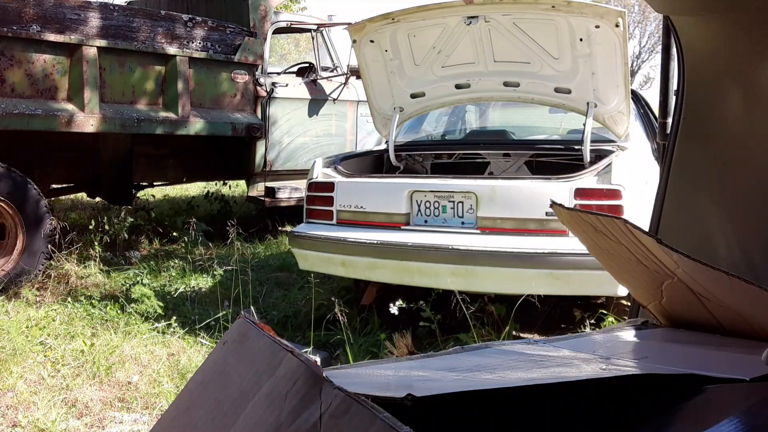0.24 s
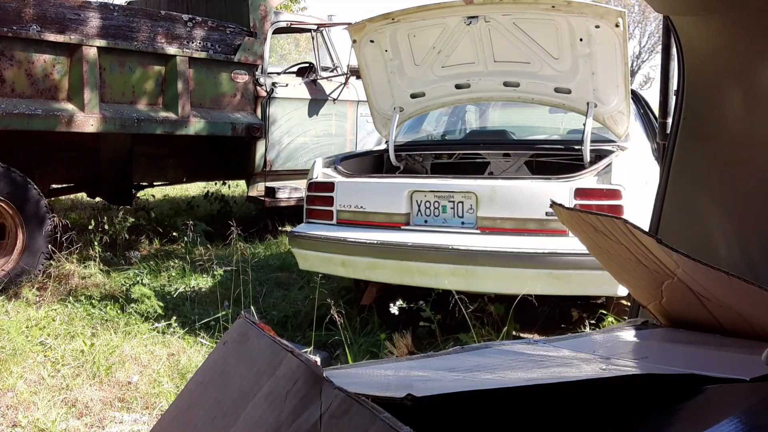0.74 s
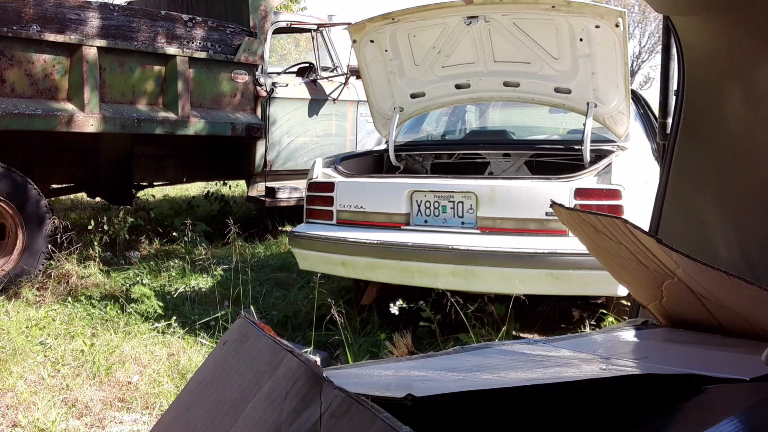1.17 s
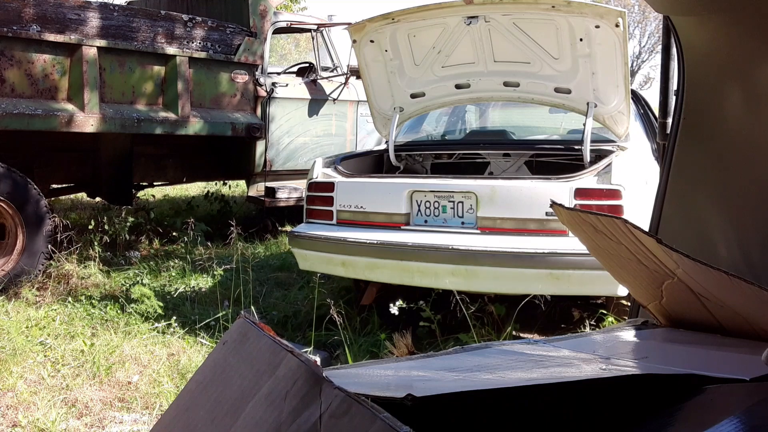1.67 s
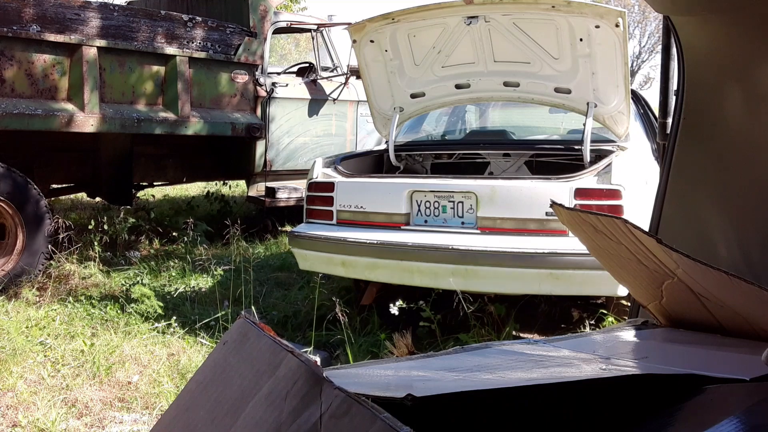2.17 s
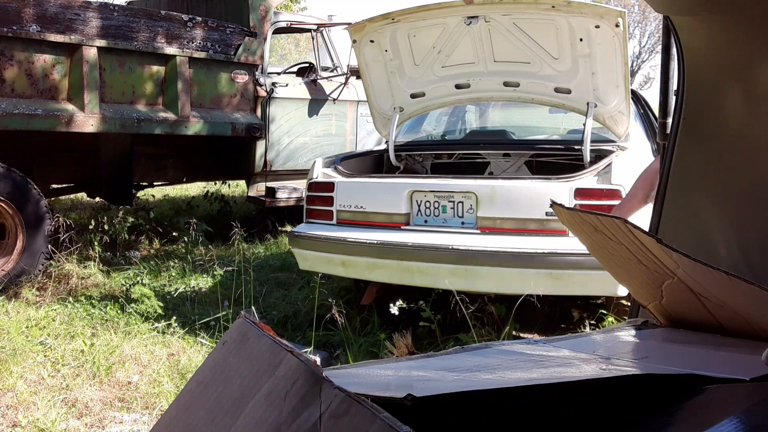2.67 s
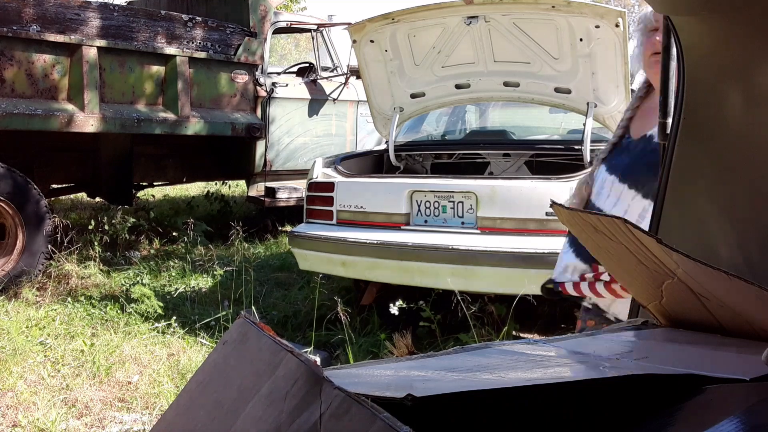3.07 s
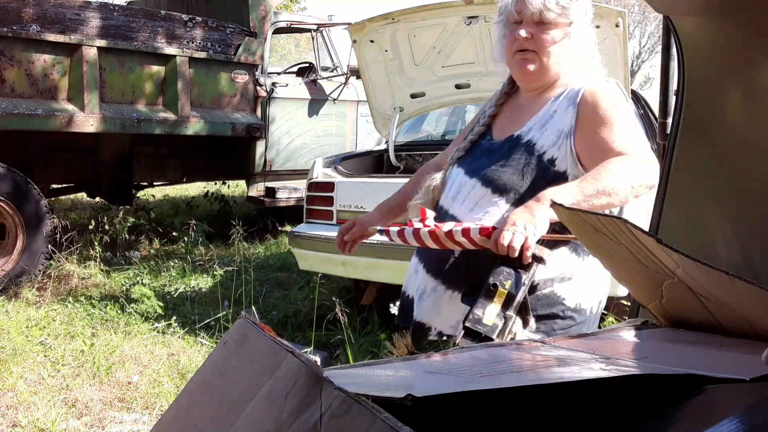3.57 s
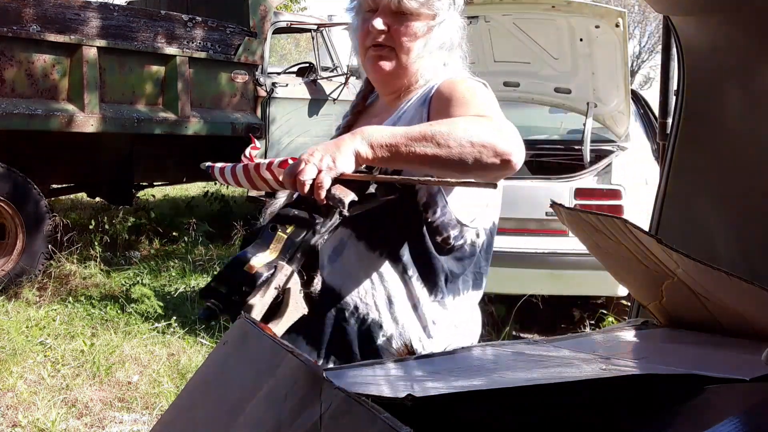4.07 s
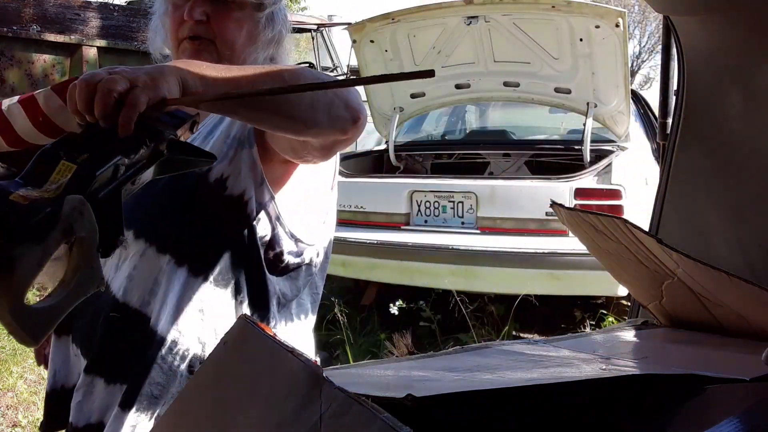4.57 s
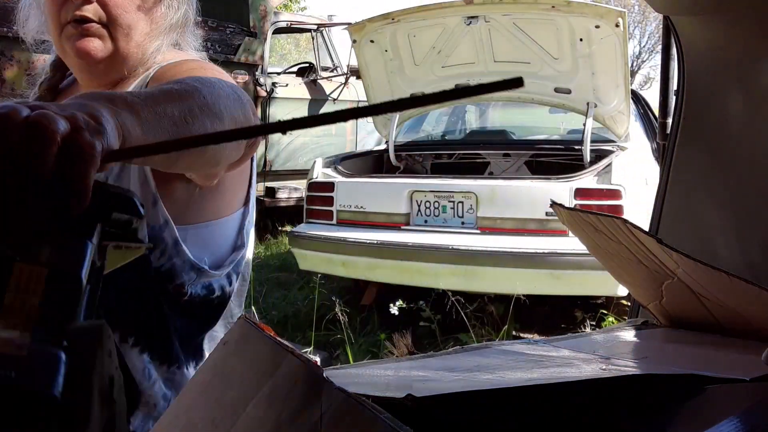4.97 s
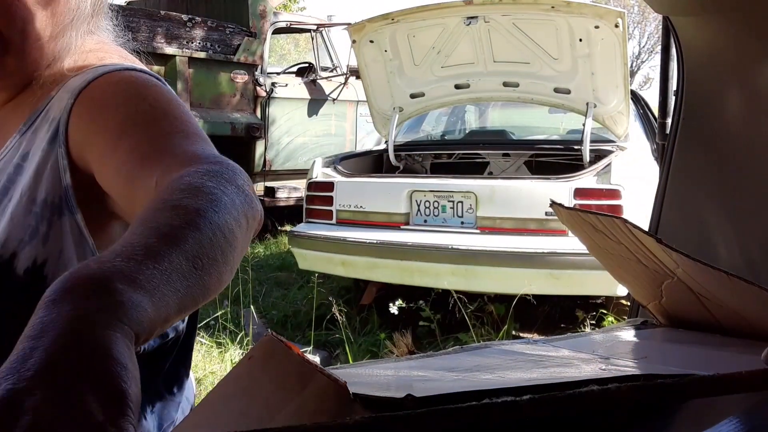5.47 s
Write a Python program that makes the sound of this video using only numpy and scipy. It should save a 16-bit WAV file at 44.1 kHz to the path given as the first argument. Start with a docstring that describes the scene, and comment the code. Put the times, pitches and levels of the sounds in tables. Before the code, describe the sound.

Heard from an open car boot, outdoor insects sing: evenly pulsing cricket chirps and a thin, throbbing rasp that grows and then stops suddenly. After a faint metal clink, someone walks closer over grass, twigs cracking and cloth rustling. Finally a tool is shoved onto a cardboard box close to the microphone, making a short, loud cluster of hollow knocks and scrapes.

```python
"""A sunny yard heard from inside an open car boot. From the start a cricket chirps in threes and a katydid
rasps, both by stridulation, over a hiss of distant insects; something clinks on metal further off.
From 1.3 s footsteps come closer through the grass while the katydid swells, to break off at 4 s.
At 5 s the walker leans a power tool on a cardboard box by the microphone and shoves it across:
friction scrapes and flexes the panels, and impacts ring their damped modes."""
import sys
import numpy as np
from scipy import signal
from scipy.fft import rfft, irfft
from scipy.io import wavfile
from scipy.ndimage import uniform_filter1d

SR = 44100
rng = np.random.default_rng(int(sys.argv[2]) if len(sys.argv) > 2 else 0)


def inscribe(sig):
    """Save sig as 16-bit PCM at rate SR to the path in sys.argv[1].

    A 1-D sig is mono; a 2-D sig holds one channel per row.
    Samples are clipped to [-1, 1] before scaling.
    """
    pcm = np.round(np.clip(np.atleast_2d(sig).T, -1, 1) * 32767)
    wavfile.write(sys.argv[1], SR, pcm.astype(np.int16))


N = 252246
TIME = np.arange(N) / SR
HZ = np.fft.rfftfreq(N, 1 / SR)

# Levels in the tables are relative; a source may add a gain of its own.
# panel modes of the box: pitch_hz, level_db, t60_s
PANEL_MODES = [(192, -11.5, 0.19), (337, -6.5, 0.03), (644, -2, 0.034), (853, 0.5, 0.046),
               (1020, -18, 0.033), (1905, -6, 0.032), (2595, -8, 0.032)]
# shoves of the tool: peak_s, scrape_db, flex_db, rise_s
SHOVES = [(5.238, -34.5, -26.5, .017), (5.264, -26, -28, .016), (5.291, -17, -22, .013),
          (5.314, -16.5, -26, .011), (5.336, -21, -30, .019), (5.374, -28, -27.5, .014),
          (5.445, -38.5, -41, .034), (5.566, -50, -52.5, 0.073)]
# spectra of sliding grit and of bending cardboard: frequency_hz, level_db
SCRAPE_SPECTRUM = [(200, -30), (380, -8), (500, -13), (630, -5.5), (900, -4), (1200, -6), (1900, -7.5),
                   (2650, -6), (3700, -10.5), (5500, -12), (8500, -15), (15800, -16.5)]
FLEX_SPECTRUM = [(25, -31), (55, -10), (110, 2), (180, 2.5), (320, -2), (420, -5.5), (800, -12),
                 (2000, -46)]
# low modes shaken by every shove: pitch_hz, width_hz, level_db
LOW_MODES = [(84, 14, -11.5), (180, 50.3, -8.5), (290, 81.6, -7.5)]
def cardboard(scrape_db=-2, flex_db=-1.5, fall_ratio=1.14):
    """Sliding friction is a broadband force: it scrapes grit, bends the box and drives its resonances."""
    sliding = swells([(s, db, rise) for s, db, _, rise in SHOVES], fall_ratio)
    bending = swells([(s, db, rise) for s, _, db, rise in SHOVES], fall_ratio)
    resonances = 1 + sum(band(hz, 0.85 / t60) for hz, _, t60 in PANEL_MODES)
    scrape = noise(amp(spectrum(SCRAPE_SPECTRUM)) * resonances, grain_db=1) * amp(scrape_db)
    flex = noise(amp(spectrum(FLEX_SPECTRUM)), grain_db=2) * amp(flex_db)
    flex += sum(amp(db) * rubbed_mode(hz, width) for hz, width, db in LOW_MODES)
    return sliding * scrape + bending * flex


# impacts on the box: start_s, level_db, decay_ratio, pitch_ratio
BLOWS = [(5.2285, -15, 0.62, 1.19), (5.268, -9.5, 0.52, 0.34), (5.279, -5, 0.81, 1),
         (5.3095, -5, 0.41, 0.86), (5.321, -13.5, 0.68, 0.64), (5.368, -11, 0.85, 0.326)]
def blows(gain_db=-7, crack_db=-6, crack_t60_s=0.033, attack_s=0.00038):
    """Impulse excitation: the tool's edges strike with a crack and the panel modes decay freely."""
    out = np.zeros((2, N))
    t = np.arange(SR // 4) / SR
    onset = 1 - np.exp(-t / attack_s)
    for s, db, decay_ratio, pitch_ratio in BLOWS:
        skews = rng.standard_normal((len(PANEL_MODES), 2, 1))  # high modes reach the sides out of phase
        modes = 0
        for (hz, mode_db, t60), skew in zip(PANEL_MODES, skews):
            phase = 2 * np.pi * hz * pitch_ratio * t + skew * hz / 1000
            modes += amp(mode_db - 60 * t / (t60 * decay_ratio)) * np.sin(phase)
        crack = rng.standard_normal((2, len(t))) * amp(crack_db - 60 * t / crack_t60_s) * pitch_ratio
        add(out, s, amp(db + gain_db) * (modes + crack) * onset)
    return echoes(out, t60_s=0.083, wet_db=-10)


def flap(level_db=-46):
    """Forced vibration: a flap drones while the tool's weight is on it."""
    load = gate(5.03, 5.53, attack_s=0.0068, release_s=.03)
    return amp(level_db) * rubbed_mode(hz=63, width_hz=18.3) * load


# squeaks and hollow rubs: peak_s, level_db, rise_s, pitch_hz
RUBS = [(2.662, -58, 0.057, 598), (2.758, -54, 0.014, 2530), (3.49, -59, .17, 600), (5.048, -46, .018, 325),
        (5.109, -49, 0.029, 310), (5.18, -47, 0.015, 980), (5.45, -50, 0.018, 2670)]
def rubs(width_ratio=.27):
    """Friction between loose parts excites one rough pitch at each contact."""
    return sum(swell(s, db, rise, rise) * rubbed_mode(hz, width_ratio * hz) for s, db, rise, hz in RUBS)


# footfalls: peak_s, tread_db, blades_db, rise_s
STEPS = [(1.275, -56, -64, 0.062), (2.152, -56, -60, 0.084), (2.743, -52.5, -52, 0.066),
         (3.269, -46.5, -52.5, 0.056), (3.83, -46, -53, 0.059), (4.38, -58, -51.5, 0.047)]
# the approaching walker's steady rustle: time_s, level_db
RUSTLE_LEVEL = [(1.45, -73), (1.65, -66.5), (2.0, -68), (2.42, -75), (3.07, -74.5), (3.15, -56.5),
                (3.95, -55.5), (4.13, -64), (4.3, -56.5), (4.55, -58), (4.95, -65)]
# cloth brushing past: peak_s, level_db, rise_s
CLOTH_SWISHES = [(2.61, -56, 0.05), (3.145, -47, 0.025), (3.68, -50, .05), (4.24, -46, 0.035),
                 (4.56, -59, 0.044), (4.81, -55, .05), (5.025, -51, 0.015), (5.165, -47.5, 0.068),
                 (5.451, -39.5, 0.017), (5.59, -53.5, 0.066)]
# spectra of crushed grass and of brushed blades or cloth: frequency_hz, level_db
TREAD_SPECTRUM = [(35, -10), (60, 0), (100, -7), (170, 2.5), (300, -1.5), (480, -2), (620, 0), (800, -9),
                  (1150, -16), (1400, -7.5), (2000, -38), (3800, -20), (6000, -25)]
SWISH_SPECTRUM = [(300, -9), (700, 3), (1500, -2), (3000, -3.5), (5500, -3), (8000, 1), (12000, 3),
                  (16000, -1)]
def footsteps(lumps_db=2, blades_lead_s=0.0047, thin_below_hz=323):
    """Many tiny contacts sum to noise: soles crush grass, stems crackle, blades and cloth swish."""
    soles = swells([(s, db, rise) for s, db, _, rise in STEPS]) * amp(lumps_db * drift(32))
    blades = swells([(s - blades_lead_s, db, rise) for s, _, db, rise in STEPS])
    brushing = np.hypot(blades, swells(CLOTH_SWISHES, fall_ratio=0.78))
    walking = amp(curves(RUSTLE_LEVEL)[0]) * gate(STEPS[0][0], 5.36, attack_s=0.11, release_s=0.11)
    crushing = np.hypot(soles * amp(-14), walking * amp(-7))
    grass = amp(spectrum(TREAD_SPECTRUM))
    tread = noise(grass, grain_db=3.5) * soles * amp(-2)
    rustle = noise(grass * HZ / np.hypot(HZ, thin_below_hz), grain_db=3) * walking * amp(-2)
    crunch = noise(band(2025, 5200) ** 2, grain_db=2.5) * crushing
    swish = noise(amp(spectrum(SWISH_SPECTRUM)), grain_db=2.5) * brushing * amp(4)
    return tread + rustle + crunch + swish


# twigs and small knocks: start_s, level_db, pitch_hz, t60_s
SNAPS = [(2.094, -38, 3700, .037), (2.747, -39, 4170, .046), (3.1415, -37, 745, 0.05),
         (3.2234, -26, 616, 0.022), (3.2806, -35, 430, 0.055), (3.779, -39.5, 1500, 0.074),
         (3.8336, -34, 347, .11), (3.9704, -37.5, 480, 0.055), (4.412, -38, 350, 0.056),
         (4.648, -43, 450, 0.056), (5.0205, -47, 2620, .03), (5.5105, -38, 5500, .026),
         (5.5862, -37, 4210, .034)]
def snaps(gain_db=-5, width_octaves=.9):
    """Heavy damping makes each snap a broad resonance that dies fast."""
    out = np.zeros((2, N))
    t = np.arange(SR // 8) / SR
    edge_ratio = 2 ** (width_octaves / 2)
    for s, db, hz, t60 in SNAPS:
        resonance = signal.butter(2, [hz / edge_ratio, hz * edge_ratio], "band", fs=SR, output="sos")
        burst = unit(signal.sosfilt(resonance, rng.standard_normal((2, len(t)))))
        add(out, s, amp(db + gain_db - 60 * t / t60) * burst)
    return out


# chirps, timed by their first stroke: peak_s, level_db, stroke_gap_s
CHIRPS = [(0.137, -40, 0.036), (.433, -40, .036), (.761, -38, 0.036), (1.072, -38, .035),
          (1.398, -39, 0.037), (1.736, -37.5, .0335), (2.042, -38, 0.036), (2.369, -38.5, 0.036),
          (2.68, -37.5, 0.034), (2.997, -38.5, 0.037), (3.305, -37.5, .035), (3.646, -37, .0355),
          (3.983, -38, 0.034), (4.316, -38.5, 0.036), (4.642, -41, .036), (4.969, -42.5, 0.037),
          (5.640, -47.5, 0.037)]
def cricket(first_stroke_db=(-1.5, -8), bounce_gain=.28, bounce_delays_s=(.0057, .0043)):
    """Interference: a reflection off nearby metal beats against the three gliding strokes of a chirp."""
    song = np.zeros((2, N))
    for s, db, gap in CHIRPS:
        start = s + WING_STROKE[0][0]
        add(song, start, amp(db) * amp(first_stroke_db)[:, None] * wing_stroke(pitch_ratio=1))
        for k in (1, 2):
            add(song, start + k * gap, amp(db) * wing_stroke(pitch_ratio=0.99))
    bounce = np.array([np.roll(side, round(s * SR)) for side, s in zip(song, bounce_delays_s)])
    return echoes(song + bounce_gain * bounce, t60_s=.14, wet_db=-7.5)


# one cricket stroke, timed from its peak: time_s, pitch_hz, left_db, right_db
WING_STROKE = [(-.017, 4520, -30, -23), (-.011, 4540, -3, -16), (-.006, 4760, -26, 7),
               (-.002, 4540, 0, -26), (.002, 4490, 0, -13), (.0055, 4400, -10, -3), (0.011, 4200, -22, -34),
               (0.022, 4100, -22, -37)]
# its overtones: harmonic_number, level_db
OVERTONES = [(2, -21), (3, -19)]
def wing_stroke(pitch_ratio, roughness=0.49, jitter=0.0067):
    """Stridulation: a scraper runs along a file of teeth, giving an arching, slightly uneven tone."""
    t = np.arange(WING_STROKE[0][0], WING_STROKE[-1][0], 1 / SR)
    hz, *sides_db = curves(WING_STROKE, t)
    unevenness = uniform_filter1d(rng.standard_normal((2, len(t))), size=90)
    grip, speed = (unit(row) for row in uniform_filter1d(unevenness, size=70))
    phase = 2 * np.pi * np.cumsum(hz * pitch_ratio * (1 + jitter * speed)) / SR
    tone = np.sin(phase) + sum(amp(db) * np.sin(k * phase) for k, db in OVERTONES)
    return amp(sides_db) * (1 + roughness * np.tanh(grip)) * tone


# the katydid's crescendo: time_s, level_db
KATYDID_LEVEL = [(0, -49.5), (1.3, -49.5), (1.8, -45.5), (2.15, -44.5), (2.33, -48), (2.6, -43),
                 (3.0, -40.5), (3.25, -38.5), (4.0, -36.5)]
# its wing sweeps: time_s, rate_hz
SWEEP_RATE = [(0, 32.1), (1.99, 32.1), (2.04, 29.7), (2.53, 29.7), (2.58, 30.7)]
# its tooth strikes: frequency_hz, level_db
RASP_SPECTRUM = [(8000, -36), (10000, -21), (10900, -13), (12100, -13), (13000, -7), (13950, .5),
                 (14250, -1), (14600, 2), (14850, -.5), (15200, 0), (17000, -4)]
def katydid(gain_db=-2, waver_db=0.5, throb_from_s=2.1, stop_s=4.003, release_s=0.013):
    """Amplitude modulation: a very high rasp of tooth strikes throbs with each sweep of the wings."""
    since_stop = TIME - stop_s
    stopped = np.clip(since_stop / release_s, 0, 1)
    others_db = -51 - 3.5 * since_stop  # fainter katydids sing on, fading
    db = (1 - stopped) * curves(KATYDID_LEVEL)[0] + stopped * others_db
    depth = np.where(TIME < throb_from_s, .13, .4)
    sweeps = np.cumsum(curves(SWEEP_RATE)[0]) / SR + 1 / 3
    throb = 1 + depth * np.cos(2 * np.pi * sweeps)
    rasp = noise(amp(spectrum(RASP_SPECTRUM)))
    return rasp * amp(db + gain_db + waver_db * drift(60)) * throb


# modes of the struck metal: pitch_hz, level_db, t60_s
METAL_MODES = [(665, -51, 0.063), (1340, -55, 0.029), (2226, -51, 0.055), (2360, -36, 0.03),
               (3020, -58, .05), (3380, -58, .06)]
def clink(start_s=.347, attack_s=0.0046):
    """Free vibration: struck metal rings briefly in inharmonic modes that scatter round the yard."""
    out = np.zeros(N)
    t = np.arange(SR // 4) / SR
    ring = sum(amp(db - 60 * t / t60) * np.sin(2 * np.pi * hz * t) for hz, db, t60 in METAL_MODES)
    onset = 1 - np.exp(-(t / attack_s) ** 2)
    add(out, start_s, onset * ring)
    return echoes(out, t60_s=0.42, wet_db=-3)


def far_crickets(level_db=-66, waver_db=2.85):
    """Songs of random phase merge into a wavering narrow band of noise."""
    return noise(band(4520, 840) ** 2) * amp(level_db + waver_db * drift(25))


# distant insects: frequency_hz, level_db
CHORUS_SPECTRUM = [(5000, -46), (6200, -19), (7000, -8), (7750, -4), (7930, 4), (8150, -5), (8700, -8.5),
                   (10000, -15.5), (12000, -9.5), (14000, -12), (16000, -8)]
# their rise and fall: time_s, level_db
CHORUS_LEVEL = [(0, -53.5), (2, -52.5), (3.9, -51), (4.3, -51), (5, -53.5), (5.72, -57)]
def chorus(gain_db=-0.5, flutter_hz=61, depth=0.038):
    """Incoherent summation: many distant insects blend into a fluttering hiss."""
    phase = 2 * np.pi * flutter_hz * TIME
    flutter = 1 + depth * np.cos(phase + drift(2.5)) + depth * np.cos(phase / 2)
    hiss = noise(amp(spectrum(CHORUS_SPECTRUM)), grain_db=-2)
    return hiss * amp(curves(CHORUS_LEVEL)[0] + gain_db) * flutter


# still outdoor air: frequency_hz, level_db
AIR_SPECTRUM = [(15, -55), (25, -0.5), (76, -0.5), (209, 2), (247, -1), (305, 0), (332, -5), (484, -6.5),
                (538, -11), (910, -11.5), (3800, -32), (4940, -38), (8360, -120)]
def air(murmur_db=-68.5, waver_db=0.76, hiss_db=-69.5):
    """The ambient noise floor: a diffuse low murmur and a faint broadband hiss."""
    murmur = noise(amp(spectrum(AIR_SPECTRUM)), coherence_scale=0.12)
    murmur *= amp(murmur_db + waver_db * drift(12))
    return murmur + amp(hiss_db) * noise(band(4000, 15100))


def boot_reflections(x, wet_db=-7, count=6):
    """Early reflections: the walls of the boot return a few delayed copies to each side."""
    out = x.copy()
    for side in range(2):
        for delay_s, sign in zip(rng.uniform(.002, .014, count), rng.choice([-1, 1], count)):
            add(out[side], delay_s, sign * amp(wet_db) / np.sqrt(count) * x[side])
    return out


def echoes(x, t60_s, wet_db):
    """Reverberation: scattered reflections decay exponentially, different for each side."""
    t = np.arange(SR // 2) / SR
    taps = rng.standard_normal((2, len(t))) * amp(-60 * t / t60_s) * (t > .002)
    taps /= np.linalg.norm(taps, axis=1, keepdims=True)
    return x + amp(wet_db) * signal.fftconvolve(np.atleast_2d(x), taps, axes=1)[:, :N]


def rubbed_mode(hz, width_hz, judder_db=2):
    """Random modulation: a mode driven by friction wanders in pitch and strength."""
    cycles = np.cumsum(hz + width_hz / 2 * drift(width_hz)) / SR
    return unit(amp(judder_db * drift(width_hz)) * np.sin(2 * np.pi * cycles))


# likeness of left and right: frequency_hz, coherence
COHERENCE = [(50, 1), (140, 0.71), (300, 0.92), (650, 0.35), (1400, -0.094), (7000, -0.057),
             (15000, -0.028)]
def noise(gain, grain_db=0, coherence_scale=1):
    """Partly coherent stereo noise; grain_db spreads the sizes of its half-millisecond grains."""
    grains = np.minimum(rng.exponential(1, N), 5)
    sizes = amp(grain_db * np.repeat(grains, 22)[:N])
    left, independent = rfft(rng.standard_normal((2, N)) * sizes)
    coherence = np.clip(coherence_scale * spectrum(COHERENCE), -1, 1)
    right = coherence * left + np.sqrt(1 - coherence ** 2) * independent
    return unit(irfft(np.array([left, right]) * gain, N))


def drift(rate_hz):
    """Low-passed noise: a slow random fluctuation of rms 1."""
    low_pass = np.exp(-(HZ / rate_hz) ** 2)
    return unit(irfft(rfft(rng.standard_normal(N)) * low_pass, N))


def band(hz, width_hz):
    """A resonance curve; the width is taken at half gain."""
    return 1 / (1 + ((HZ - hz) / width_hz * 2) ** 2)


def swell(peak_s, db, rise_s, fall_s):
    """A rounded envelope with exponential flanks."""
    away = np.minimum(abs(TIME - peak_s) / np.where(TIME < peak_s, rise_s, fall_s), 20)
    return amp(db) / np.cosh(away * np.sqrt(2))


def swells(rows, fall_ratio=1):
    """Power addition of (peak_s, level_db, rise_s) swells; fall_ratio is fall time over rise time."""
    return np.sqrt(sum(swell(s, db, rise, fall_ratio * rise) ** 2 for s, db, rise in rows))


def gate(start_s, end_s, attack_s, release_s):
    """An envelope that opens and closes smoothly."""
    return (1 + np.tanh((TIME - start_s) / attack_s)) * (1 - np.tanh((TIME - end_s) / release_s)) / 4


def spectrum(points):
    """Interpolates (frequency_hz, value) points on a log-frequency axis."""
    hz, value = np.transpose(points)
    return np.interp(np.log(HZ + 1), np.log(hz + 1), value)


def curves(rows, t=TIME):
    """Interpolates each column of (time_s, ...) rows linearly."""
    s, *columns = np.transpose(rows)
    return [np.interp(t, s, column) for column in columns]


def add(mix, start_s, sound):
    """Superposes a sound on the mix."""
    part = mix[..., max(round(start_s * SR), 0):][..., :sound.shape[-1]]
    part += sound[..., :part.shape[-1]]


def amp(db):
    """Decibels to amplitude ratio."""
    return 10 ** (np.asarray(db) / 20)


def unit(x):
    """Normalises to rms 1."""
    return x / np.sqrt(np.mean(x ** 2) + 1e-20)


def scene():
    """Superposition: the pressures of all sources add."""
    yard = cricket() + far_crickets() + katydid() + chorus() + air()
    walker = boot_reflections(footsteps() + snaps())
    tool_on_box = blows() + cardboard() + flap() + rubs()
    return tool_on_box + walker + yard + clink()


def record(dry, left_db=4, right_db=-3, low_cut_hz=44, ceiling=0.94, high_cut_hz=15750):
    """Transduction: microphones of unequal sensitivity, a low cut, soft saturation and a band limit."""
    low_cut = signal.butter(3, low_cut_hz, "high", fs=SR, output="sos")
    high_cut = signal.firwin(801, high_cut_hz, window=("kaiser", 8), fs=SR)
    picked_up = signal.sosfilt(low_cut, dry * amp([[left_db], [right_db]]))
    saturated = ceiling * np.tanh(picked_up / ceiling)
    return signal.oaconvolve(saturated, high_cut[None], "same")


dry = scene()
out = record(dry)
inscribe(out)
```